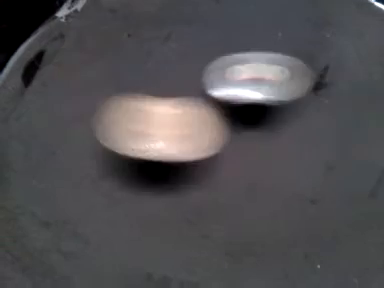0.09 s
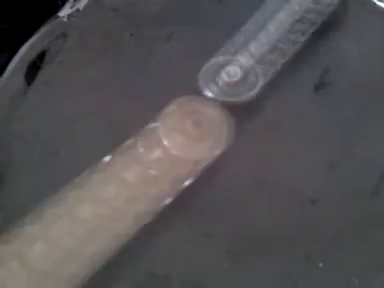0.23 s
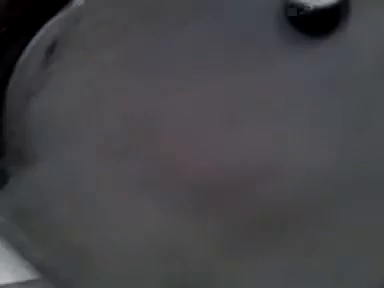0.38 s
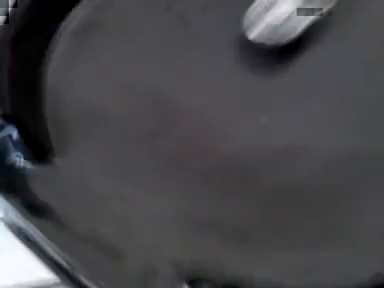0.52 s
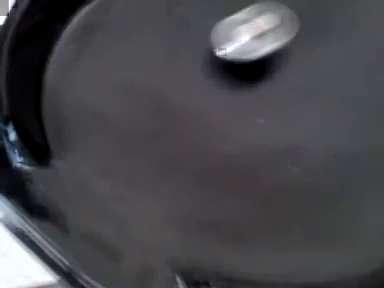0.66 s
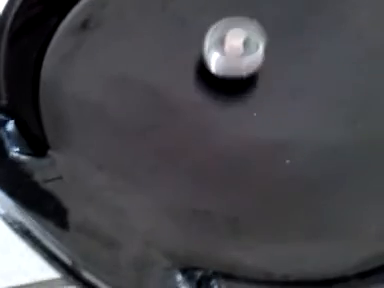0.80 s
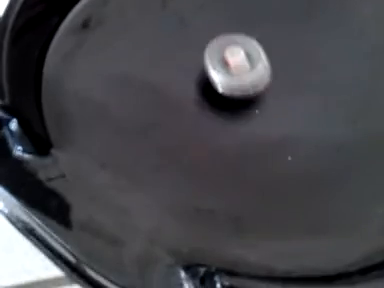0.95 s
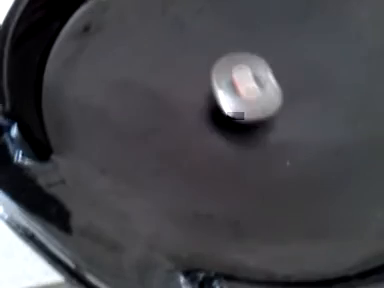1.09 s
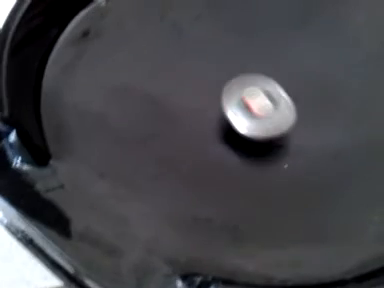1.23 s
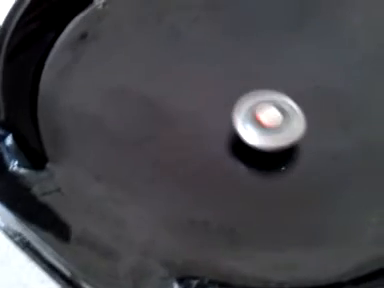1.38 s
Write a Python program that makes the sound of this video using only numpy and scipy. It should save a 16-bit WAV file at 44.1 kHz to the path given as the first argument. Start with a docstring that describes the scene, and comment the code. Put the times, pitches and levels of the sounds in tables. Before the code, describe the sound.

Hard spinning tops crack together and knock against the wall of a shallow plastic arena in quick, loud clusters with a brief ring. One top then keeps whirring and ticking faintly, heard close up in a small room.

```python
"""Spinning tops in an arena

Two hard tops clash in a shallow plastic arena and are thrown against its wall, which booms and rings.
Each impact excites modes that decay freely. One top stays in: its tip whirs on the floor and it ticks
as it settles. A small room reverberates. The sound is band-limited, and the loudest blows clip."""
import sys
import numpy as np
from scipy import signal
from scipy.fft import rfft, irfft, next_fast_len
from scipy.io import wavfile

SR = 44100
rng = np.random.default_rng(int(sys.argv[2]) if len(sys.argv) > 2 else 0)


def store_pcm(level_fs):
    """Save levels as 16-bit WAV."""
    pcm = np.round(np.clip(level_fs, -1, 1) * 32767).astype(np.int16)
    wavfile.write(sys.argv[1], SR, np.atleast_2d(pcm).T)


N = 61739
T = np.arange(N) / SR
FFT_SIZE = 2 * next_fast_len(N // 2 + 1)
HZ = np.arange(FFT_SIZE // 2 + 1) * SR / FFT_SIZE


def from_db(db):
    """Amplitude ratio: a factor of ten for every 20 dB."""
    return 10 ** (np.asarray(db) / 20)


def unit_rms(x):
    """Normalisation to unit mean power."""
    return x / np.sqrt(np.mean(x ** 2) + 1e-20)


def at_hz(curve, hz):
    """Interpolation on a logarithmic frequency axis."""
    frequencies, values = np.transpose(curve)
    return np.interp(np.log(hz + 0.00102), np.log(frequencies), values)


def decay(t60_s):
    """Exponential damping: a fall of 60 dB in t60_s."""
    return from_db(-60 * T / t60_s)


def rise(time_constant_s):
    """First-order growth towards 1."""
    return 1 - np.exp(-T / time_constant_s)


def add(out, start_s, x):
    """Superposition of x on out, delayed by start_s."""
    i = int(start_s * SR)
    out[i:] += x[:N - i]


def noise(spectrum):
    """Spectral shaping of white noise, at unit rms."""
    white = rfft(rng.standard_normal(FFT_SIZE))
    return unit_rms(irfft(white * from_db(at_hz(spectrum, HZ)))[:N])


def resonance(hz, width_hz):
    """Steady-state response of a resonator to random forcing, at unit rms."""
    b, a = signal.iirpeak(hz, hz / width_hz, fs=SR)
    return unit_rms(signal.lfilter(b, a, rng.standard_normal(N + 2000))[2000:])


def ring(modes):
    """Free vibration as a sum of damped sinusoids."""
    return sum(from_db(db) * np.sin(2 * np.pi * hz * T) * decay(t60_s) for hz, db, t60_s in modes)


def damp_by_band(x, t60_curve):
    """Frequency-dependent damping: each band below 8 kHz decays at its own rate."""
    spectrum, out = rfft(x, FFT_SIZE), np.zeros(N)
    edges_hz = [0, 200, 400, 800, 1600, 8000]
    for low, high in zip(edges_hz, edges_hz[1:]):
        band = irfft(spectrum * ((HZ >= low) & (HZ < high)))[:N]
        out += band * decay(at_hz(t60_curve, (low + high) / 2))
    return out


# Spectra of the tip's whir and of its scratch: frequency_hz, density_db
WHIR_SPECTRUM = [(30, -24.5), (120, -12), (190, -15), (260, -3.5), (340, -5), (560, 3.5), (850, -4),
                 (1170, -1.5), (1700, -9.5), (2600, -18), (3500, -18), (4200, -21.5)]
SCRATCH_SPECTRUM = [(200, -53.5), (1200, -32), (2000, -4), (2900, -3), (3600, -9.5), (4200, -12)]
# The fading tail of an earlier hit, then the tip's whir and scratch: time_s, whir_db, scratch_db
WHIR_AND_SCRATCH = [(0, -32, -71), (.08, -36.5, -60), (.2, -35.5, -71), (.4, -20.5, -39), (.65, -32, -51),
                    (.8, -47, -38.5), (.93, -40.5, -45.5), (1.1, -41.5, -37), (1.28, -37, -34.5),
                    (1.4, -38, -41)]

def spinning_tip(grains_per_s=1400):
    """Friction: as an earlier hit fades, the tip whirs, scratches and drives a low hum near 245 Hz."""
    time_s, whir_db, scratch_db = np.transpose(WHIR_AND_SCRATCH)
    grains = (rng.random(N) < grains_per_s / SR) * rng.standard_normal(N)
    grain_response = noise(SCRATCH_SPECTRUM) * decay(t60_s=0.02)
    scratch = unit_rms(signal.fftconvolve(grains, grain_response)[:N])
    scratch *= from_db(np.interp(T, time_s, scratch_db))
    whir = from_db(np.interp(T, time_s, whir_db)) * noise(WHIR_SPECTRUM)
    hum = from_db(-49.5) * resonance(hz=245, width_hz=45)
    return whir + scratch + hum


# Spectrum of the crack between the tops: frequency_hz, density_db
CRACK_SPECTRUM = [(60, -14), (300, -3.5), (700, 4.5), (1200, 9.5), (1900, -4), (2700, 4), (3400, 1),
                  (4200, -10)]
# Modes of the metal top: pitch_hz, level_db
METAL_MODES = [(2310, -8), (2690, -9), (2790, -9), (2900, -8), (3265, -6), (3335, 0), (3385, -5),
               (3460, -1)]
# Impacts of top on top: start_s, crack_db, ring_db
TOP_CLASHES = [(.2145, -16.5, -44), (.218, -4, -31.5), (.2228, -3.5, -47), (0.2291, -9, -23.5),
               (0.2999, -8, -36), (0.3051, 3, -35), (0.3287, -18, -52), (0.42, -5, -50), (0.431, -3.5, -49),
               (0.439, -0.5, -41), (0.45, -6.5, -54.5), (0.708, -8.5, -58.5), (.717, -15.5, -50),
               (0.7225, -17, -40)]

def top_clashes():
    """Hard impact: a brief contact radiates a broadband crack and excites the metal's thin ring."""
    out = np.zeros(N)
    metal = ring([(hz, db, 0.29) for hz, db in METAL_MODES])
    for start_s, crack_db, ring_db in TOP_CLASHES:
        crack = from_db(crack_db) * noise(CRACK_SPECTRUM) * decay(t60_s=0.046)
        add(out, start_s, crack + from_db(ring_db) * metal)
    return out


# Modes of the plastic bowl: pitch_hz, level_db, t60_s
BOWL_MODES = [(285, -19, 0.29), (347.7, -5, 0.37), (425.7, -6.5, 0.45), (522.8, 3, 0.21), (648, -5.5, 0.16),
              (748.6, -5.5, 0.58), (1019, -11.5, 0.44), (1096, -9, 0.78), (1202, -6.5, 0.32),
              (1350, -6.5, .22), (1350, -16, 0.3)]
# Modes of the rim, close enough to beat: pitch_hz, level_db
RIM_MODES = [(840, -9), (882, -9), (917, -7), (942, -10), (959, 0), (974, -8), (1000, -13), (1037, -14)]
# Spectrum of the thin shell's clatter: frequency_hz, density_db
SHELL_SPECTRUM = [(40, -51), (80, -37), (120, -10.5), (175, -16), (400, -0.5), (650, 2), (1100, -5.5),
                  (1800, -14.5), (3000, -25), (4200, -26.5)]
# Decay times of that clatter: frequency_hz, t60_s
SHELL_DECAY = [(60, 0.11), (400, 0.12), (1200, 0.11), (3500, .08)]
# Impacts of a top on the wall: start_s, shell_db, spot_pitch_hz, spot_db, bowl_db, rim_db
WALL_KNOCKS = [(.2215, -12.5, 741, -1.5, -34, -55), (.3035, -9, 627, 0, -36, -48),
               (.311, -6, 601, 8, -12.5, -40), (.324, -4.5, 578, 1, -39, -50),
               (.361, -9, 737, -11.5, -35, -40), (.400, -22.5, 950, -13.5, -47, -44),
               (.411, -8, 894, 5, -9.5, -20), (.424, 0, 996, 6.5, -14, -43), (.437, 3, 1209, 3, -17.5, -5),
               (.463, -28.5, 530.7, -1, -27, -14.5), (.475, -16, 937, 0, -24.5, -22),
               (.4905, -19, 930, -3.5, -37.5, -26), (.688, -11, 719, -1.5, -44, -46),
               (.693, -8, 705.6, 4, -25.5, -45.5), (.7075, -8, 694, 1.5, -36, -19.5),
               (.716, -10, 619, 0.5, -39, -56), (.7235, -10, 478, 0, -39, -26.5),
               (.734, -20, 401.3, -2.5, -32, -40), (.741, -10.5, 464, -4, -32, -60)]

def wall_knocks():
    """Modal response of a shell: the struck spot booms, the wall clatters, bowl and rim ring on."""
    spots, body, rim = np.zeros((3, N))
    attack, boom = rise(0.00055), decay(t60_s=0.056)
    bowl_ring = ring(BOWL_MODES)
    rim_ring = ring([(hz, db, 0.33) for hz, db in RIM_MODES])
    for start_s, shell_db, pitch_hz, spot_db, bowl_db, rim_db in WALL_KNOCKS:
        crowded_modes = from_db(-7) * resonance(pitch_hz, width_hz=160)
        spot = np.sin(2 * np.pi * pitch_hz * T) + crowded_modes
        clatter = from_db(shell_db) * damp_by_band(noise(SHELL_SPECTRUM), SHELL_DECAY)
        add(spots, start_s, from_db(spot_db) * spot * boom * attack)
        add(body, start_s, (clatter + from_db(bowl_db) * bowl_ring) * attack)
        add(rim, start_s, from_db(rim_db) * rim_ring * attack)
    return spots, body, rim


# Spectrum of the floor's thud: frequency_hz, density_db
THUD_SPECTRUM = [(100, -34), (300, -20), (600, 10), (1150, 11.5), (1800, -13), (4000, -11.5)]
# Rattle of the remaining top: start_s, level_db, pitch_hz, thud_db
SETTLING_TICKS = [(0.7717, -9.5, 3000, -18), (0.783, -17.5, 3040, -37), (0.8238, -20, 2190, -38),
                  (0.8443, -16.5, 3280, -21), (0.9784, -21.5, 2800, -29), (0.983, -23.5, 2650, -31),
                  (0.9933, -19.5, 3530, -22), (1.03, -18.5, 3500, -34), (1.0832, -30, 3340, -40),
                  (1.1261, -24.5, 3070, -47), (1.1434, -24.5, 2710, -51.5), (1.175, -21.5, 2830, -28),
                  (1.182, -24.5, 2900, -45.5), (1.232, -44, 2830, -48), (1.2804, -23.5, 3040, -39),
                  (1.2986, -16, 3460, -28), (1.327, -26, 2930, -28.5)]

def settling_ticks():
    """Damped resonance: each light contact briefly excites the top, with a faint thud of the floor."""
    out = np.zeros(N)
    envelope = rise(0.00039) * decay(t60_s=0.02)
    for start_s, level_db, pitch_hz, thud_db in SETTLING_TICKS:
        tick = from_db(level_db) * resonance(pitch_hz, width_hz=560)
        thud = from_db(thud_db) * noise(THUD_SPECTRUM)
        add(out, start_s, (tick + thud) * envelope)
    return out


# Reverberation times of the small room: frequency_hz, t60_s
ROOM_DECAY = [(150, 0.15), (300, 0.42), (600, 0.33), (1100, 0.49), (2800, 0.49)]

def room(x, delay_s=0.008, build_s=0.01):
    """Diffuse reverberation: convolution with a delayed tail of decaying noise."""
    tail = np.zeros(N)
    reflections = rng.standard_normal(N) * rise(build_s)
    tail_norm = np.linalg.norm(reflections * decay(ROOM_DECAY[-1][1]))
    add(tail, delay_s, damp_by_band(reflections, ROOM_DECAY) / tail_norm)
    return signal.fftconvolve(x, tail)[:N]


def scene():
    """Superposition: the impacts and their reverberation add to the direct sound of the tip."""
    clashes = top_clashes()
    spots, body, rim = wall_knocks()
    ticks = settling_ticks()
    room_sends_db = [(clashes, -15.5), (spots, -14.5), (body, -8), (rim, -4.5), (ticks, -10)]
    reverberation = room(sum(from_db(db) * layer for layer, db in room_sends_db))
    return (spinning_tip() + clashes + spots + body + rim + ticks + reverberation)[None]


def record(dry, low_hz=55, high_hz=3614, ceiling=0.71, hardness=12.3, cutoff_hz=16000):
    """Band-limiting, then saturation: the loudest blows clip and a low-pass trims their overtones."""
    x = signal.sosfilt(signal.butter(1, low_hz, "high", fs=SR, output="sos"), dry)
    x = signal.sosfilt(signal.butter(14, high_hz, fs=SR, output="sos"), x)
    clipped = x / (5.5 + np.abs(x / ceiling) ** hardness) ** (1 / hardness)
    return signal.sosfilt(signal.cheby1(12, 0.2, cutoff_hz, fs=SR, output="sos"), clipped)


dry = scene()
out = record(dry)
store_pcm(out)
```